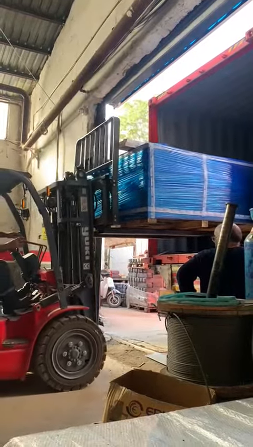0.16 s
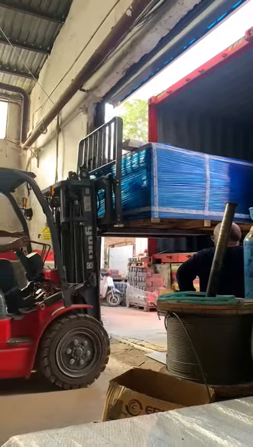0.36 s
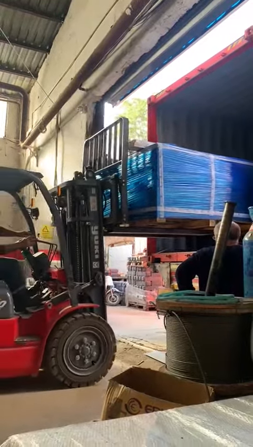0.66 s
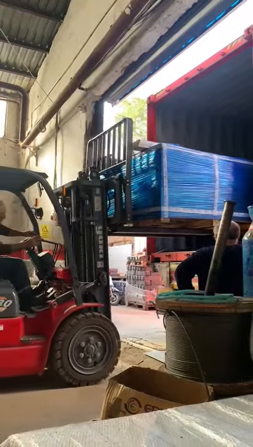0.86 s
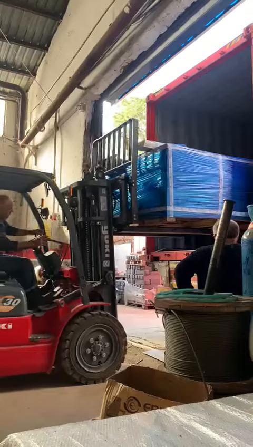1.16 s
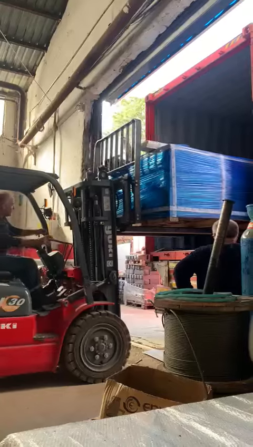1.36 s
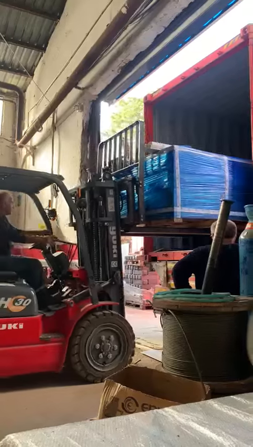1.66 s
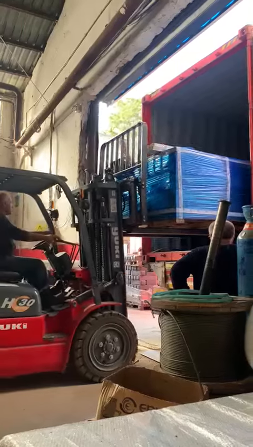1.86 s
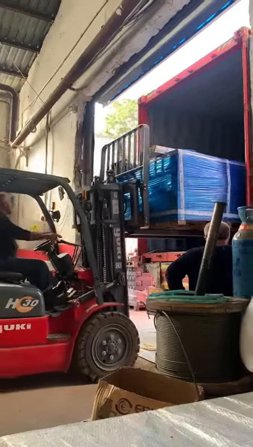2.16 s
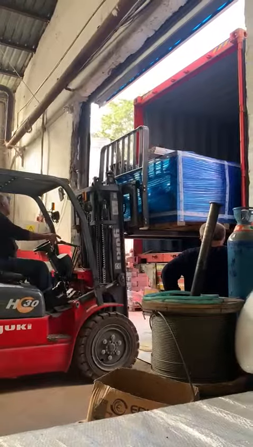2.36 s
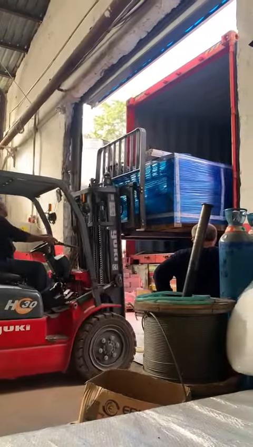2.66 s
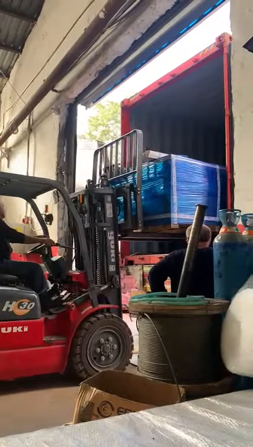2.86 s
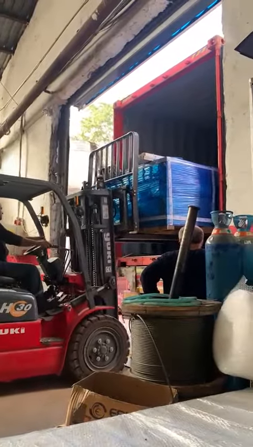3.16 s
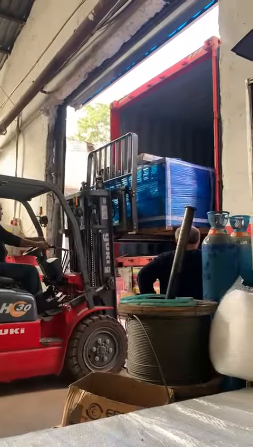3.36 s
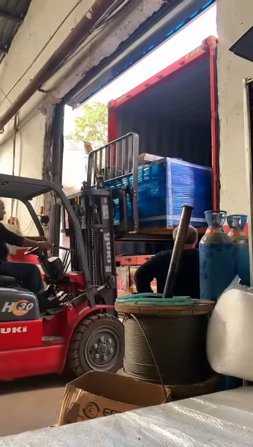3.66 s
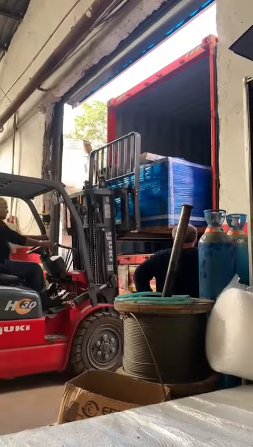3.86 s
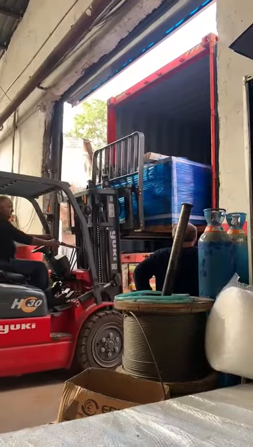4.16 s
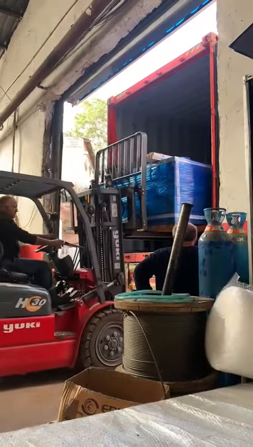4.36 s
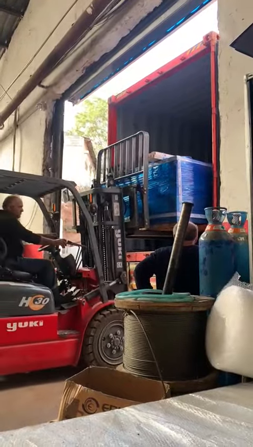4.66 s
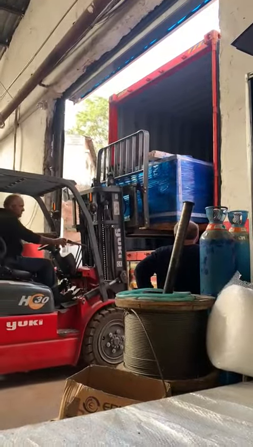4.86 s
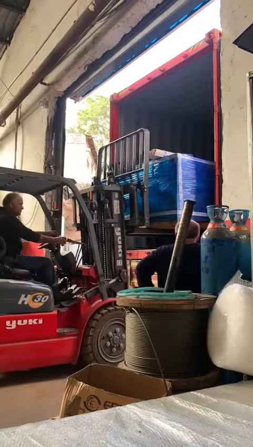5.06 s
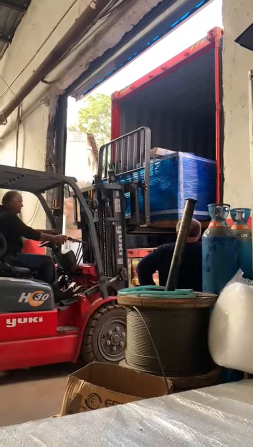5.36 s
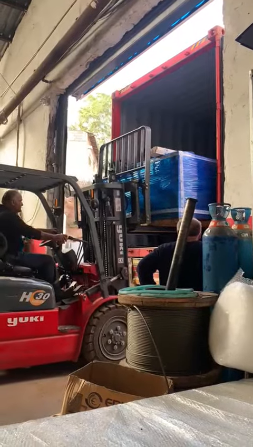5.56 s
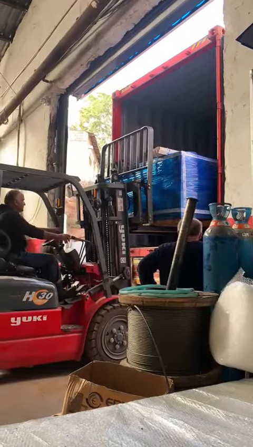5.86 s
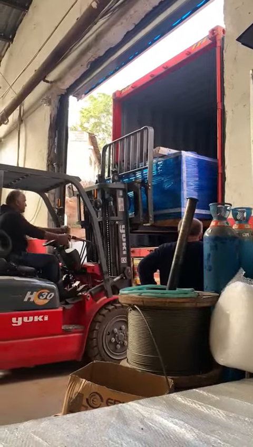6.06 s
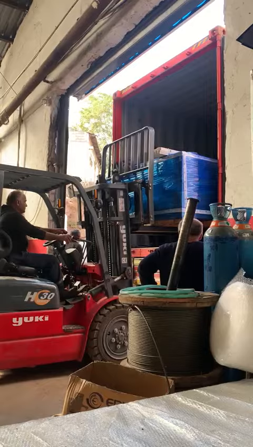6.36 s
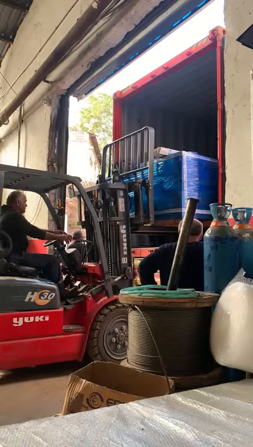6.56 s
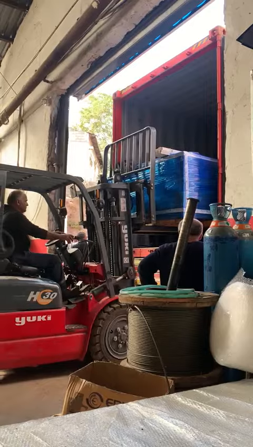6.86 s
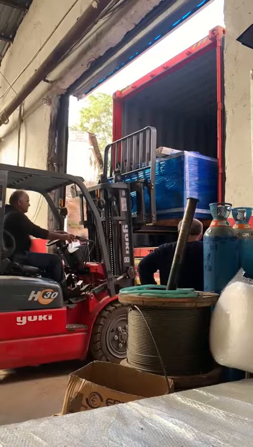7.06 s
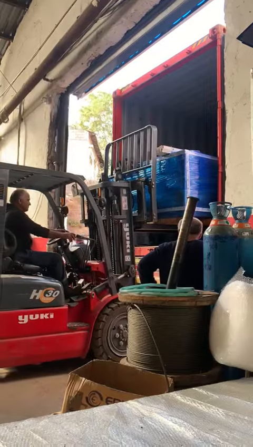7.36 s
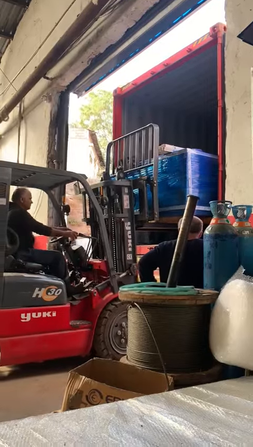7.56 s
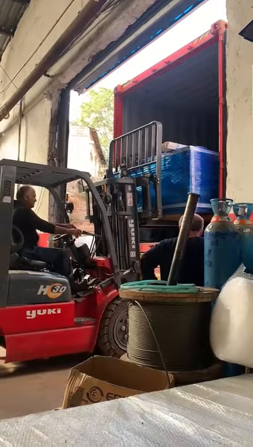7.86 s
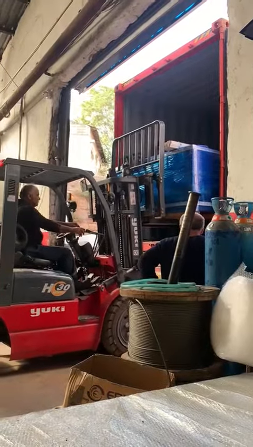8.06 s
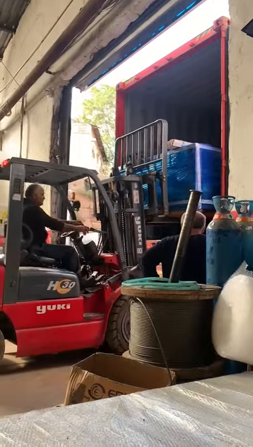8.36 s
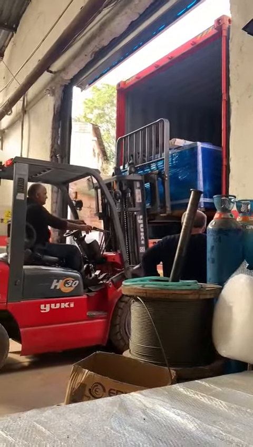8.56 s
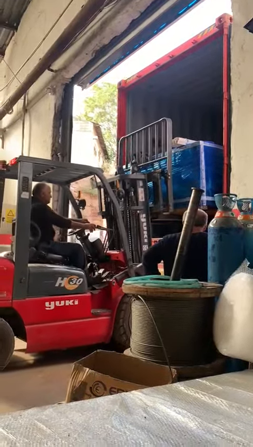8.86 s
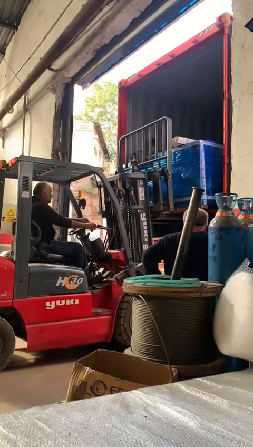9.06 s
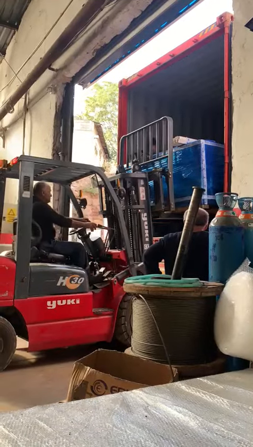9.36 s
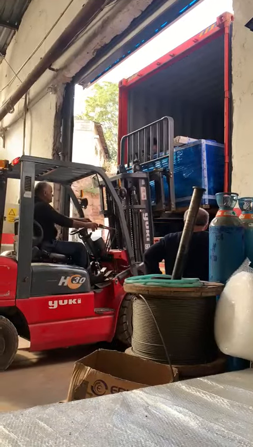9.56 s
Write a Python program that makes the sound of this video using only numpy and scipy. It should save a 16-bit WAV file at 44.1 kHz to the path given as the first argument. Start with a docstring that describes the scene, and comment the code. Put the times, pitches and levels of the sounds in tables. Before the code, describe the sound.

Rough, knocking diesel idle with a brief upward squeak, then a growling engine surge in two steps, a quick drop and a renewed rev.

```python
"""A four-cylinder diesel forklift idles in a warehouse, revs, eases off and revs again as it pushes a load.
Each firing excites the exhaust, bodywork and block: steady engine lines are harmonics of the firing rate,
and knocks, ticks and rumble are noise bursts filtered by resonances. Late ignitions knock harder.
Fan hiss and hall reflections fill the gaps, a growl and a whine join where engine lines meet resonances,
and one short squeak, a friction tone, slides upward at idle."""
import sys
import numpy as np
from scipy import signal
from scipy.fft import rfft, irfft, next_fast_len
from scipy.io import wavfile

SR = 44100
rng = np.random.default_rng(int(sys.argv[2]) if len(sys.argv) > 2 else 0)


def output_pcm(signal):
    """Save a mono or channel-first signal as 16-bit PCM at the path in sys.argv[1].

    Samples are clipped to [-1, 1] before scaling.
    """
    pcm = np.clip(np.atleast_2d(signal).T, -1, 1) * 32767
    wavfile.write(sys.argv[1], SR, np.round(pcm).astype(np.int16))


N = 427769
TIME = np.arange(N) / SR

# resonances of exhaust and bodywork: centre_hz, width_hz, level_db
BODY_MODES = [(147, 12, -11), (177.6, 13, 3), (215, 4.3, -3), (258.7, 20, 2), (280.6, 4.7, 2),
              (285.7, 11, 2.5), (326, 28, 2), (370, 18, -10), (477, 18, -5.5), (588, 16, -12),
              (610, 22, -8.5), (643, 20, -8.5), (654, 21, -13), (984, 60, -17)]
# the cylinders in firing order, relative strengths: knock_db, tick_db
CYLINDERS = [(8, 7), (11, 7.5), (10, 8), (9.5, 8)]
KNOCK_DB, TICK_DB = np.transpose(CYLINDERS)


def from_db(db):
    """Amplitude gain is ten to the power of a twentieth of the decibels."""
    return 10 ** (np.asarray(db) / 20)


def rms_one(x):
    """Normalisation: divide by the root mean square to get unit power."""
    return x / np.sqrt(np.mean(x ** 2) + 1e-20)


def in_time(rows):
    """Linear interpolation of a curve's columns at every sample."""
    start_s, *columns = np.transpose(rows)
    return [np.interp(TIME, start_s, column) for column in columns]


def swell(centre_s, half_s):
    """A Gaussian rise and fall of height 1."""
    return np.exp(-np.minimum(((TIME - centre_s) / half_s) ** 2, 60))


def drift(corner_hz):
    """Slow random modulation: noise through a critically damped low-pass, with spread 1."""
    step = 100   # computed at every hundredth sample
    pole = np.exp(-2 * np.pi * corner_hz * step / SR)
    noise = rng.standard_normal(N // step + 1002)
    slow = signal.lfilter([1], [1, -2 * pole, pole ** 2], noise)[1000:]
    return np.interp(np.arange(N) / step, np.arange(len(slow)), rms_one(slow))


def gain_at(points, hz):
    """Spectral envelope: decibels interpolated on a log-frequency axis, as gain."""
    at_hz, db = np.transpose(points)
    return from_db(np.interp(np.log(hz), np.log(at_hz), db))


def shaped(x, response):
    """Linear filtering: multiply the spectrum by a response given as a function of frequency."""
    size = next_fast_len(N + SR, real=True)
    hz = np.maximum(np.arange(size // 2 + 1) * SR / size, 1)
    return irfft(rfft(x, size) * response(hz), size)[..., :N]


def resonance(modes, hz):
    """Modal superposition: the summed power of Lorentzian resonances."""
    return sum(from_db(db) ** 2 / (1 + (2 * (hz - centre) / width) ** 2)
               for centre, width, db in modes)


def hall(x, wet_db, turns_per_s=0.3468):
    """Reverberation: direct sound plus an exponentially dying tail, shifting as the truck moves."""
    t60_s, first_echo_s = 0.87, 0.012
    t = TIME[:SR]
    tails = rng.standard_normal((2, SR)) * from_db(-60 * t / t60_s) * (t > first_echo_s)
    one, other = (signal.fftconvolve(np.atleast_2d(x), [tail / np.linalg.norm(tail)], axes=1)[:, :N]
                  for tail in tails)
    # turn gradually between two independent patterns of reflections
    turn = 2 * np.pi * turns_per_s * TIME
    return x + from_db(wet_db) * (one * np.cos(turn) + other * np.sin(turn))


def effort(rate, idle_db, per_octave_db, surge_db, load_share):
    """Gain rises with log speed, fuel for acceleration (surge_db per octave a second) and load."""
    # load on the engine as the truck pushes forward: start_s, load_db
    load = [(0, .5), (1.8, .5), (3.2, -.5), (4.72, -0.2), (5.0, -1), (5.6, 0.4), (6.3, 1.55), (6.8, 2.5),
            (7.4, 1.3), (7.95, 1.1), (8.25, 0), (8.68, 0.1), (8.86, -2), (9.05, -1), (9.7, -1)]
    idle_rate_hz, fuel_smooth_s = 28, 0.058   # the fuel follows the pedal over this time
    octaves = np.log2(rate / idle_rate_hz)
    keep = np.exp(-1 / (fuel_smooth_s * SR))
    surge = signal.lfilter([1 - keep], [1, -keep], np.gradient(octaves) * SR + 1e-18)
    load_db, = in_time(load)
    return from_db(idle_db + per_octave_db * octaves + surge_db * surge + load_share * load_db)


def blows(firings, rate, cylinders_db, decay_s, rise_s, fill, scatter_db):
    """Impulsive excitation: each firing rises fast and decays over a steady bed, by cylinder strength."""
    number = firings.astype(int)
    age_s = firings % 1 / rate
    scatter = scatter_db * rng.standard_normal(N // 100)[number]
    strength = from_db(cylinders_db[number % len(cylinders_db)] + scatter)
    burst = rms_one(strength * (1 - np.exp(-age_s / rise_s)) * np.exp(-age_s / decay_s))
    return rms_one(np.sqrt(burst ** 2 + fill ** 2))


def rattle(firings, repeat, memory=0.836):
    """Partly cyclic noise: each cylinder's burst correlates with its last; rows: direct, scattered path."""
    number = firings.astype(int)
    cycle, cylinder = np.divmod(number, len(CYLINDERS))
    bursts = rng.standard_normal((cycle[-1] + 1, len(CYLINDERS), SR // 20, 2))
    for k in range(1, len(bursts)):
        bursts[k] = memory * bursts[k - 1] + np.sqrt(1 - memory ** 2) * bursts[k]
    age = np.arange(N) - np.searchsorted(number, number)   # samples since the firing
    cyclic = bursts[cycle, cylinder, age].T
    # repeat is the share of the power that is cyclic
    return np.sqrt(repeat) * cyclic + np.sqrt(1 - repeat) * rng.standard_normal((2, N))


def harmonic(firings, order, waver_db, waver_rad):
    """A harmonic of the firing rate: a sine of about unit power, wavering in strength and phase."""
    angle = 2 * np.pi * (order * firings + rng.random()) + waver_rad * drift(4.2)
    return np.sqrt(2) * np.sin(angle) * from_db(waver_db * drift(7.0))


def fan_hiss(firings, rate, flutter_db=1.03):
    """Turbulent noise: the rush of fan and intake, amplitude-modulated gently by the firings."""
    # broad spectrum of the rush: centre_hz, level_db per Hz (relative)
    rush = [(1500, 7.5), (2600, -1.5), (3600, 6.5), (4700, 6), (5500, 2.5), (7000, 1), (8200, -4.5),
            (9000, -6), (11500, -8.5), (13000, -56)]
    throb = blows(firings, rate, TICK_DB, decay_s=.015, rise_s=.004, fill=1.1, scatter_db=.6)
    throb = throb * from_db(flutter_db * drift(14.0))
    hiss = rms_one(shaped(rng.standard_normal((2, N)) * throb, lambda hz: gain_at(rush, hz)))
    return effort(rate, idle_db=-37.5, per_octave_db=3.0, surge_db=1.9, load_share=0.84) * hiss


def squeak(rough=.027):
    """Stick-slip friction: an unsteady tone slides upward in a few slips and lingers in the hall."""
    # the one upward slide: low_hz, high_hz, middle_s, slide_s
    glide = (1890, 2790, 1.705, 0.028)
    # slips of the rubbing contact: centre_s, half_s, level_db
    slips = [(1.44, 0.04, -35.5), (1.662, 0.012, -34), (1.698, 0.017, -19.5), (1.737, 0.011, -19),
             (1.778, 0.038, -25)]
    low_hz, high_hz, middle_s, slide_s = glide
    hz = low_hz + (high_hz - low_hz) * (1 + np.tanh((TIME - middle_s) / (2 * slide_s))) / 2
    tone = np.sin(2 * np.pi * np.cumsum(hz * (1 + rough * drift(170))) / SR)
    level = sum(from_db(db) * swell(s, half_s) for s, half_s, db in slips)
    return hall(np.sqrt(2) * level * tone, wet_db=-2)


def whine(firings, rate, level_db=-38, order=17):
    """Gear-locked tone: an accessory sings at 17 times the firing rate, meeting a resonance at idle."""
    gain = np.sqrt(resonance([(481, 30, level_db)], order * rate))
    return gain * harmonic(firings, order, waver_db=2.8, waver_rad=.16)


def growl(firings, rate, centre_hz=293, width_hz=11, level_db=-24, order=6.25):
    """Beating: at full revs a line of the unequal cylinders meets a narrow body mode near other lines."""
    gain = np.sqrt(resonance([(centre_hz, width_hz, level_db)], order * rate))
    return gain * harmonic(firings, order, waver_db=1, waver_rad=.45)


def drone(firings, rate, half_db=-7, odd_db=-1, uneven_db=-7):
    """Swept resonance: lines swell at body modes or set a panel humming; uneven cylinders add quarter orders."""
    # a panel hums along with one engine line: centre_s, half_s, order (times the firing rate), level_db
    hums = [(0.35, 0.35, 6, -33), (0.35, 0.25, 22, -38), (0.5, 0.35, 10.25, -34), (1.05, 0.25, 22, -40),
            (1.3, 0.3, 6, -30.5), (1.6, 0.28, 12, -28.5), (2.05, 0.35, 13, -34.5), (2.05, 0.5, 11, -37),
            (2.1, 0.7, 23, -41), (2.15, 0.45, 7, -36), (2.7, 0.35, 12, -35), (3.0, 1.5, 9, -35.5),
            (3.8, 0.3, 12, -31.5), (4.6, 0.3, 9, -35), (5.05, 0.14, 5, -31), (5.2, 0.14, 7, -32),
            (5.2, 0.12, 8, -34), (6.95, 0.25, 6.5, -31), (7.85, 0.25, 12, -35), (9.17, 0.1, 7, -32),
            (5.45, 0.15, 11, -32), (5.95, 0.55, 6, -31), (6.4, 0.15, 11, -34), (7.0, 0.14, 6, -28),
            (7.1, 0.15, 7, -31), (7.4, 0.5, 5, -36), (7.65, 0.35, 6, -29), (7.9, 0.2, 10, -31),
            (8.5, 0.28, 5, -34), (8.52, 0.22, 6, -27.5), (8.55, 0.22, 11, -33), (9.5, 0.25, 6, -32)]
    orders = [*range(5, 24), 3.5, 4.5, 5.5, 6.5, 9.5, *np.arange(5.25, 11, .5)]
    orders = [k for k in orders if k not in (6.25, 17)]   # growl and whine sound these two
    step = 100   # gains are held for this many samples
    gains = []
    for k in orders:
        if k % .5:
            order_db = uneven_db
        elif k % 1:
            order_db = half_db
        else:
            order_db = odd_db * (k % 2)
        gains.append(from_db(order_db) * np.sqrt(resonance(BODY_MODES, k * rate[::step])))
    gains = np.array(gains)
    gains = gains / np.sqrt(np.mean(np.sum(gains ** 2, axis=0)))
    level = effort(rate, idle_db=-31.5, per_octave_db=7.0, surge_db=3.5, load_share=0.28)
    out = 0
    for k, gain in zip(orders, gains):
        hum = sum(from_db(db) * swell(s, half_s) for s, half_s, order, db in hums if order == k)
        amplitude = np.hypot(level * np.repeat(gain, step)[:N], hum)
        out = out + amplitude * harmonic(firings, k, waver_db=1.3, waver_rad=.14)
    return out


def rumble(firings, rate, low_rate):
    """Flow noise: each firing sends a gust of rough gas down the pipe, which shakes the body modes."""
    # broad spectrum of the gusts: centre_hz, level_db per Hz (relative)
    gust_spectrum = [(15, -33), (35, -15), (60, -9), (100, -7), (160, -6.5), (350, -8.5), (520, -22),
                     (1000, -45)]
    early = firings + .1   # gusts lead by a tenth of a firing
    gusts = blows(early, rate, KNOCK_DB, decay_s=.012, rise_s=.003, fill=.75, scatter_db=.5)
    shaking = rms_one(shaped(
        rng.standard_normal((2, N)) * gusts,
        lambda hz: gain_at(gust_spectrum, hz) * np.sqrt(0.7 + resonance(BODY_MODES, hz))))
    return effort(low_rate, idle_db=-31.0, per_octave_db=5.0, surge_db=1.0, load_share=0.16) * shaking


def injector_ticks(firings, rate):
    """Impact-excited modes: short metallic ticks ring the injectors and valve cover, clearest at idle."""
    # resonances of the injectors and valve cover: centre_hz, width_hz, level_db
    tick_modes = [(2800, 370, 0.5), (3465, 28, 13.5), (3860, 30, 10.5), (4300, 490, -0.5)]
    envelope = blows(firings, rate, TICK_DB, decay_s=.008, rise_s=.0015, fill=.2, scatter_db=.6)
    ticks = rattle(firings, repeat=0.27) * envelope
    rings = 0
    for k, (hz, width, db) in enumerate(tick_modes):
        mode = signal.lfilter(*signal.iirpeak(hz, hz / width, fs=SR), ticks)
        rings = rings + (-1) ** k * from_db(db) * mode   # neighbouring modes in opposite sign
    level = effort(rate, idle_db=-42.0, per_octave_db=-16.0, surge_db=-3.0, load_share=0.58)
    return level * rms_one(rings)


def hard_knocks(decay_s=0.015, rise_s=.002, centre_hz=1280, width_hz=760, level_db=-29.5):
    """Transient excitation: a late ignition strikes the block harder and sets its side wall ringing."""
    # late ignitions: start_s, strength_db (added to level_db)
    late_ignitions = [(0.042, 4), (0.082, 3), (0.253, 8.5), (0.608, 0), (0.743, 5), (0.777, 4),
                      (1.368, 5.5), (1.586, 9.5), (1.73, 5), (1.875, 6), (1.916, 7.5), (2.062, 10),
                      (2.205, 8), (2.35, 3.5), (2.491, 8), (2.637, 5.5), (2.922, 2), (3.36, 1),
                      (3.493, 0.5), (3.641, 7.5), (3.748, 6), (4.315, 8), (4.598, 5), (4.866, 12.5),
                      (5.061, 8.5), (5.089, 8.5), (5.384, 9.5), (5.597, 13), (5.687, 9), (5.758, 10),
                      (6.608, 15.5), (7.877, 11.5), (8.497, 9), (8.996, 7), (9.102, 12.5)]
    blow = 0
    for s, db in late_ignitions:
        age_s = np.clip(TIME - s, 0, .2)
        blow = blow + from_db(db) * (1 - np.exp(-age_s / rise_s)) * np.exp(-age_s / decay_s)
    noise = rng.standard_normal((2, N))
    wall = rms_one(shaped(noise, lambda hz: resonance([(centre_hz, width_hz, 0)], hz)))
    return hall(from_db(level_db) * blow * wall, wet_db=-9.0)


def diesel_knock(firings, rate, ring_hz=1368, ring_width_hz=75, ring_db=-12.5, ring_swell_db=7):
    """Structure-borne sound: combustion knocks the block and rings its cover, most in the first rev."""
    # broad spectrum of the knock: centre_hz, level_db per Hz (relative)
    knock_spectrum = [(200, -2.5), (400, -1.5), (580, -3), (760, -3), (1050, -3.5), (1500, -4.5),
                      (1800, -8.5), (2100, -9), (2700, -6), (3500, -15.5), (4700, -25.5), (9000, -51)]
    # resonances of the block and its covers: centre_hz, width_hz, level_db above the broad knock
    cover_modes = [(472.4, 14, 8.5), (613, 58, 6), (976, 105, 4), (1140, 35, 2.5), (1667, 86, 5),
                   (1875, 54, 3), (2746, 34, 3)]
    late = firings - .08   # just after the injector ticks
    envelope = blows(late, rate, KNOCK_DB, decay_s=.013, rise_s=.003, fill=.2, scatter_db=.5)
    hits = hall(rattle(late, repeat=0.34) * envelope, wet_db=0.5)
    block = rms_one(shaped(
        hits, lambda hz: gain_at(knock_spectrum, hz) * np.sqrt(1 + resonance(cover_modes, hz))))
    cover = rms_one(signal.lfilter(*signal.iirpeak(ring_hz, ring_hz / ring_width_hz, fs=SR), hits))
    ring = from_db(ring_db + ring_swell_db * swell(centre_s=5.63, half_s=0.96))
    level = effort(rate, idle_db=-26.0, per_octave_db=4.0, surge_db=0.5, load_share=0.95)
    return level * (block + ring * cover)


def exhaust_boom(firings, rate, third_db=-4.0, fourth_db=-4):
    """Pipe resonance: of the four lowest lines the third booms at idle, the second when revving."""
    # response of exhaust and hall to the lowest lines: centre_hz, level_db
    pipe = [(28, -23), (43, -15), (48, -14), (56, -13.5), (69, -4), (74, -16), (80, -4), (84, 1.5), (87, 0),
            (95.5, -7.5), (111, -14), (116, -2), (121, -2.5), (126, -14.5), (130, -5.5), (142, -16),
            (170, -17.5), (187, -7)]
    first = gain_at(pipe, rate) * harmonic(firings, order=1, waver_db=.5, waver_rad=.03)
    second = gain_at(pipe, 2 * rate) * harmonic(firings, order=2, waver_db=.4, waver_rad=0.02)
    third = gain_at(pipe, 3 * rate) * harmonic(firings, order=3, waver_db=.5, waver_rad=0.03)
    fourth = gain_at(pipe, 4 * rate) * harmonic(firings, order=4, waver_db=1.5, waver_rad=0.08)
    lines = first + second + from_db(third_db) * third + from_db(fourth_db) * fourth
    return effort(rate, idle_db=-21.0, per_octave_db=8.5, surge_db=0.6, load_share=0.084) * lines


def stereo_image(paths, right_db=-0.32, right_db_per_s=0.0329, scattered_share=1.0):
    """Mid-side stereo: the direct path is the mid, the scattered path the side; the image creeps right."""
    # width of the image by band: centre_hz, side_minus_mid_db
    side_lead = [(200, -23.5), (370, -10), (570, 0), (1000, -4.5), (1750, -9), (2650, 10.5), (3750, -5),
                 (4450, 1), (5050, 45.5), (6000, -8), (6900, -14), (8200, -30), (9700, 91), (11200, -19)]
    # balance of the channels by band: centre_hz, left_minus_right_db
    left_lead = [(60, 1.5), (98, -3), (160, -1), (260, -1.5), (420, 1), (620, -3), (1110, -2), (1810, -1),
                 (2940, 0), (4790, -2), (7790, 0)]
    direct, scattered = paths
    mid = shaped(direct, lambda hz: 1 / np.sqrt(1 + gain_at(side_lead, hz) ** 2))
    side_source = np.sqrt(1 - scattered_share) * direct + np.sqrt(scattered_share) * scattered
    # the side is turned by a quarter cycle
    side = shaped(side_source, lambda hz: -1j / np.sqrt(1 + gain_at(side_lead, hz) ** -2))
    pan = from_db(right_db + right_db_per_s * TIME)   # right up, left down by this much
    halves = np.array([[.5], [-.5]])
    return shaped(np.array([(mid + side) / pan, (mid - side) * pan]),
                  lambda hz: gain_at(left_lead, hz) ** halves)


def scene():
    """Phase locking: one crankshaft drives the engine layers; the low lines follow it a moment late."""
    # engine speed from idle through the revs: start_s, firing_rate_hz
    speed = [(0.0, 28.4), (0.88, 28.85), (2.0, 27.35), (2.56, 27.9), (3.8, 28.05), (4.25, 28.3),
             (4.6, 28.3), (4.72, 29), (4.88, 34), (5.06, 37), (5.2, 39.6), (5.33, 42.9), (5.45, 43.6),
             (5.7, 42.3), (6.49, 42.3), (6.74, 47.3), (7.15, 46.5), (7.3, 47.8), (8.0, 47.6), (8.25, 43.1),
             (8.72, 43.2), (8.88, 36.4), (8.95, 34.4), (9.06, 38.6), (9.24, 43.0), (9.7, 43.6)]
    build_up_s = .055   # the low lines build up in the hall this long after the crankshaft
    rate, = in_time(speed)
    firings = np.cumsum(rate) / SR + 3.92   # starts late in the fourth cylinder's turn
    low_rate = np.interp(TIME - build_up_s, TIME, rate)
    low_firings = np.cumsum(low_rate) / SR
    background = fan_hiss(firings, rate) + squeak()
    tones = whine(low_firings, low_rate) + growl(low_firings, low_rate)
    lines = drone(low_firings, low_rate) + exhaust_boom(low_firings, low_rate)
    shaking = rumble(firings, rate, low_rate)
    clatter = injector_ticks(firings, rate) + hard_knocks() + diesel_knock(firings, rate)
    return stereo_image(background + tones + lines + shaking + clatter)


def record(dry):
    """Band limiting: a steep elliptic low-pass cuts the top."""
    cutoff_hz = 11900
    return signal.sosfilt(signal.ellip(10, .2, 90, cutoff_hz, fs=SR, output="sos"), dry)


dry = scene()
out = record(dry)
output_pcm(out)
```